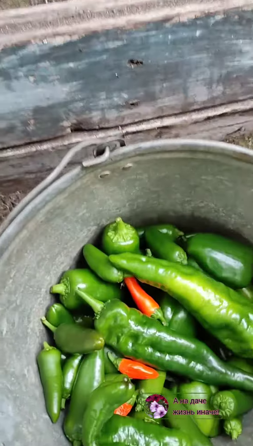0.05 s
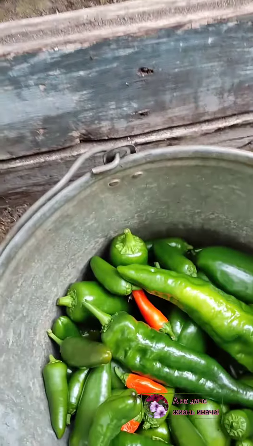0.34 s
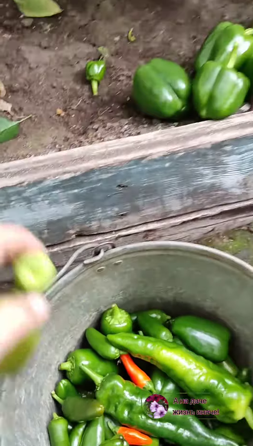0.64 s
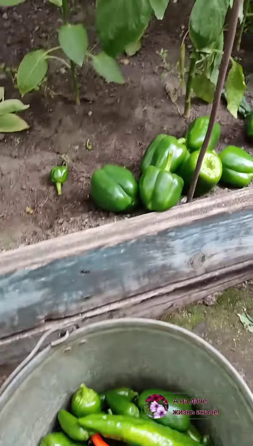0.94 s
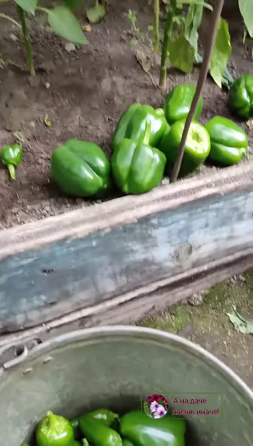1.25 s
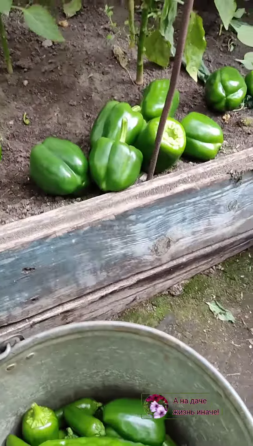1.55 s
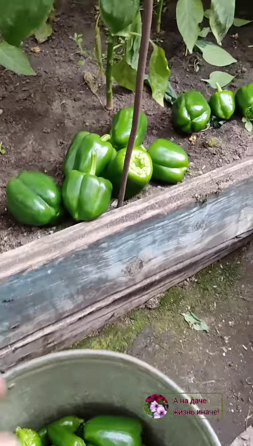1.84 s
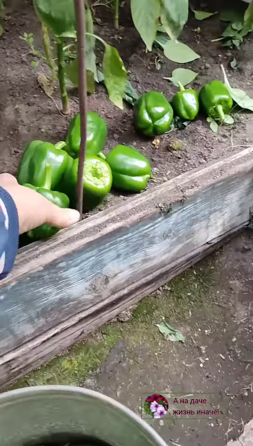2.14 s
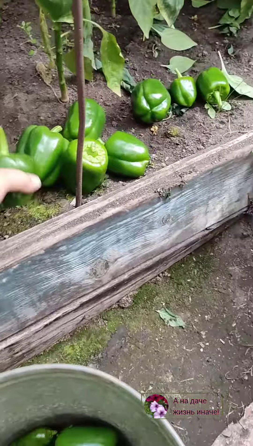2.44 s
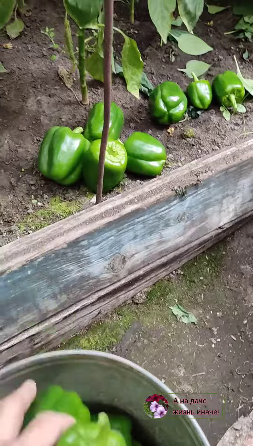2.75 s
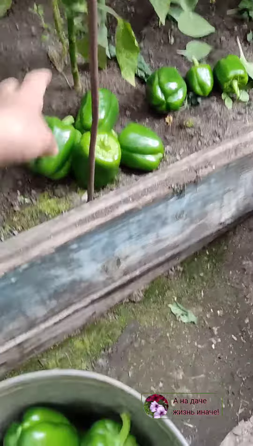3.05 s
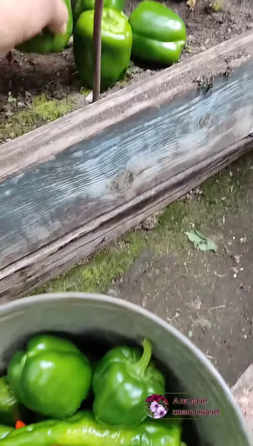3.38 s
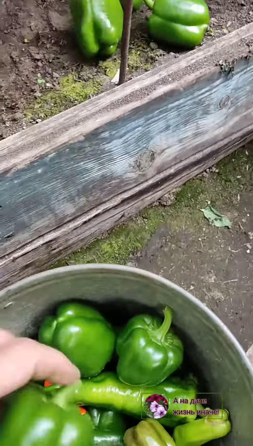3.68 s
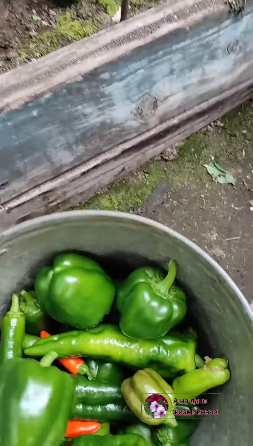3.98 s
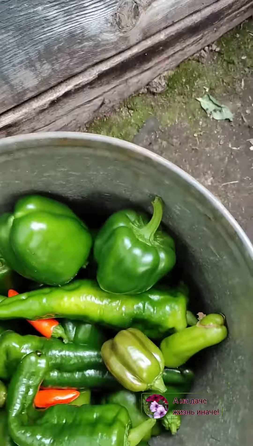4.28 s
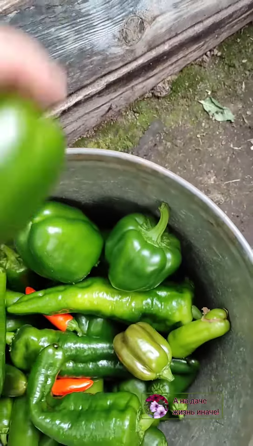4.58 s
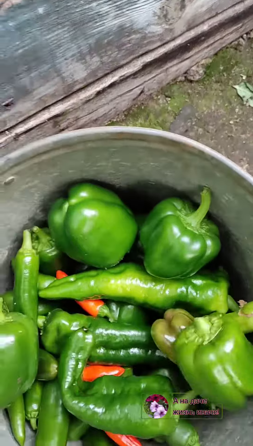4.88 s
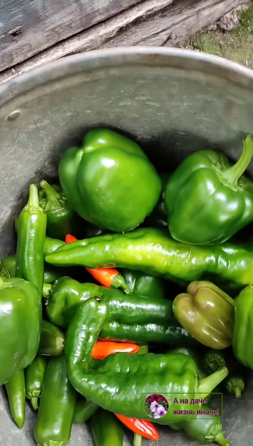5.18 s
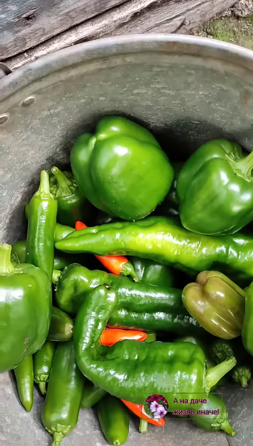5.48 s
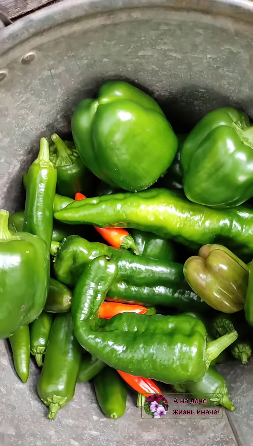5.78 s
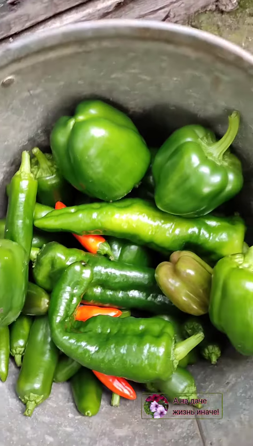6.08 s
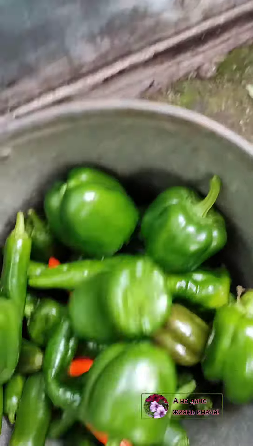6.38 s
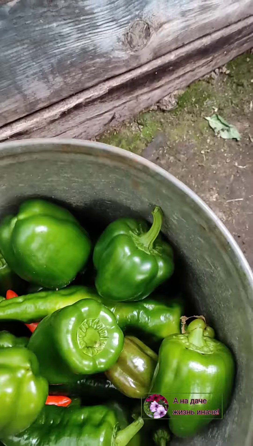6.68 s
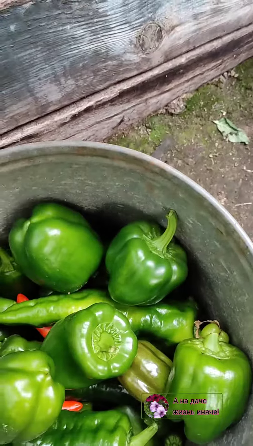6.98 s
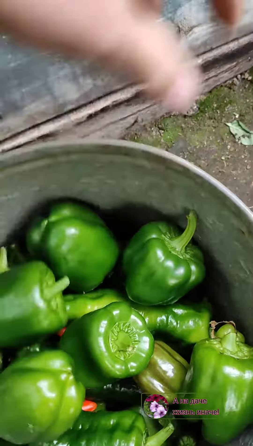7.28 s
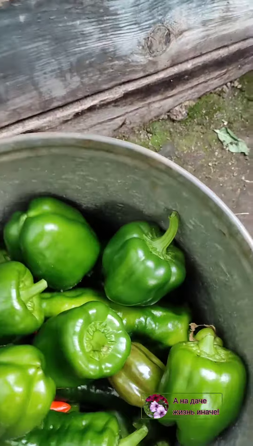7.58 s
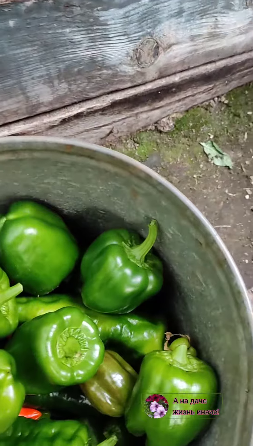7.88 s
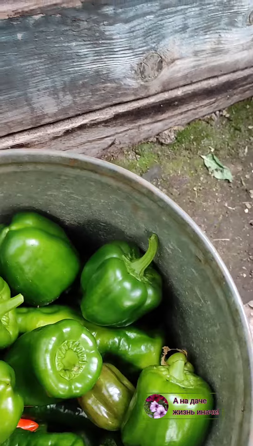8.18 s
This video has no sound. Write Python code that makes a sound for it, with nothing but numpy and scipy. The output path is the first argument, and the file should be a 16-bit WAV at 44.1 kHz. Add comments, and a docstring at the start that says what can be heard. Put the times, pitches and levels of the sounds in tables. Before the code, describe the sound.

Bell peppers drop into a metal bucket half full of peppers, close to the microphone, in a quiet greenhouse. A small tick and bump at 0.3 seconds lead to the first hollow knocks at about 0.9 seconds, as a pepper bounces and settles. A softer landing follows at 1.9 seconds. The loudest knocks come at 3 and 3.9 seconds, each with a dull thud and a brief gritty scrape of the jolted bucket. Lighter bumps follow until 4.4 seconds, then two firm knocks near 4.8 and 5 seconds make the bucket grate and hum faintly. After a lull with tiny ticks, peppers tumble in a quick cluster from 6.4 to 6.8 seconds. The last one lands at 7.4 seconds with a short scrape and faint ring. Throughout, a jacket sleeve swishes softly with each reach, continuing to the end at about 8 seconds.

```python
"""Bell peppers dropped by hand into a metal bucket half full of peppers, close to the microphone.
A jacket sleeve swishes with every reach over quiet greenhouse air; handled fruit ticks and bumps.
From 0.9 s hollow peppers land: they knock, bounce, rub the wall and rock to rest.
From 3 s hard landings jolt the bucket, whose bottom grates on grit; from 4.4 s some also set it humming.
The last pepper lands at 7.4 s and the sleeve swishes on."""
import sys
import numpy as np
from scipy import signal
from scipy.fft import rfft, irfft, next_fast_len
from scipy.io import wavfile
from scipy.ndimage import map_coordinates

SR = 44100
rng = np.random.default_rng(int(sys.argv[2]) if len(sys.argv) > 2 else 0)


def store_pcm(level_fs):
    """Save levels as 16-bit WAV."""
    pcm = np.round(np.clip(level_fs, -1, 1) * 32767).astype(np.int16)
    wavfile.write(sys.argv[1], SR, np.atleast_2d(pcm).T)


N = 362943

# left-right likeness of sleeve and air noise: f/Hz, correlation
COHERENCE = [(60, 0.015), (180, 0.69), (550, 0.25), (1650, -0.15), (4970, 0.098), (15000, -0.35)]


def amp(db):
    """Decibels to gain."""
    return 10 ** (np.asarray(db) / 20)


def unit_rms(x):
    """Scale to rms 1."""
    return x / np.sqrt(np.mean(x ** 2) + 1e-20)


def unit_energy(x):
    """Scale each channel to energy 1."""
    return x / np.linalg.norm(x, axis=-1, keepdims=True)


def along(points, hz):
    """Interpolate (f/Hz, value) points on a log axis."""
    f, v = np.transpose(points)
    return np.interp(np.log(hz + 1), np.log(f + 1), v)


def filtered(x, response):
    """Apply a frequency response."""
    n = x.shape[-1]
    m = next_fast_len(n + 8192)
    return irfft(rfft(x, m) * response(np.fft.rfftfreq(m, 1 / SR)), m)[..., :n]


def add(track, at_s, sound):
    """Mix a sound into a track."""
    part = track[..., max(round(at_s * SR), 0):][..., :sound.shape[-1]]
    part += sound[..., :part.shape[-1]]


def wobble(rate_hz):
    """Smooth random curve through Gaussian knots."""
    knots = rng.standard_normal(int(N * rate_hz / SR) + 4)
    return map_coordinates(knots, [np.arange(N) * rate_hz / SR])


def noise(gain, coherence, size):
    """Stereo noise of rms 1 with given gain and left-right correlation over frequency."""
    def mid_side(f):
        angle = np.arccos(np.clip(along(coherence, f), -1, 1)) / 2
        return gain(f) * np.array([np.cos(angle), np.sin(angle)])
    mid, side = filtered(rng.standard_normal((2, size)), mid_side)
    return unit_rms(np.array([mid + side, mid - side]))


def pan(left_right_db):
    """Channel gains for a level difference."""
    return amp([[left_right_db / 2], [-left_right_db / 2]])


def sleeve():
    """Cloth swishes and handling rumbles with each arm stroke, above a faint steady floor."""
    strokes = [(0, -55.5, 0.47), (0.79, -56.5, 0.66), (1.184, -55.5, 0.33), (1.73, -57.5, 0.33),
               (2.11, -54.5, 0.45), (2.63, -56, 0.28), (3.092, -47, 0.34), (3.558, -53.5, 0.28),
               (3.95, -54.5, 0.59), (4.2, -51.5, 0.2), (4.494, -54, 0.37), (5.07, -52, 0.4),
               (5.779, -58, 0.29), (6.119, -55, 0.29), (6.594, -53.5, 0.52), (6.99, -52.5, 0.11),
               (7.089, -52.5, 0.24), (7.673, -49.5, 0.32), (8.05, -57.5, 0.56)]  # arm strokes: fastest at t/s, level/dB, length/s
    cloth_spectrum = [(290, -47.5), (500, -35.5), (676, -7.5), (1250, -5.5), (1600, 0), (1900, -3.5),
                      (4570, -6), (4980, -10.5), (6640, -7), (7130, -12.5), (8360, -5.5), (12100, -11),
                      (15500, -13.5)]  # rubbing cloth: f/Hz, level/dB
    rumble_spectrum = [(18, -94), (30, -22.5), (86, -2.5), (135, -3), (200, -1.5), (392, 4.5), (485, -5.5),
                       (590, -2), (779, -6), (874, -6.5), (1290, -7.5), (1500, -15.5), (1950, -32.5),
                       (3300, -120)]  # handling rumble: f/Hz, level/dB
    hiss_db, rumble_db, rumble_floor_db = -70, -4.5, -65.5
    t = np.arange(N) / SR
    motion = np.sqrt(sum((amp(db) * np.exp(-np.abs(2 * (t - at_s) / length_s) ** 1.68)) ** 2
                         for at_s, db, length_s in strokes))
    swish = np.hypot(motion, amp(hiss_db)) * amp(0.98 * wobble(150) + 1.4 * wobble(18))
    swish = swish * noise(lambda f: amp(along(cloth_spectrum, f)), COHERENCE, N)
    swish *= np.hypot(1, crumbs()) * pan(-3)
    rumble = np.hypot(amp(rumble_db) * motion, amp(rumble_floor_db)) * amp(1.6 * wobble(25))
    return swish + rumble * noise(lambda f: amp(along(rumble_spectrum, f)), COHERENCE, N)


def crumbs():
    """Sparse tiny ticks of cloth and soil, as a gain on the sleeve's noise."""
    rate_hz, level_db, spread_db, decay_s = 10, 10, 1.5, 0.00065
    hits = (rng.random(N) < rate_hz / SR) * amp(level_db + spread_db * rng.uniform(-1.2, 1, N))
    return signal.lfilter([1], [1, -np.exp(-1 / (decay_s * SR))], hits)


def air():
    """Low murmur of still air."""
    spectrum = [(18, -69), (30, -43), (105, -3.5), (140, 2.5), (197, -10), (219, -23), (518, -18),
                (591, -21), (767, -16), (1910, -22.5), (15500, -48.5)]  # greenhouse air: f/Hz, level/dB
    return amp(-70.5) * noise(lambda f: amp(along(spectrum, f)), COHERENCE, N)


def rocking():
    """A pepper settles on its neighbours in uneven, fading touches; returns rows for knocks()."""
    settlings = [(.002, .02, -44.5), (1.063, .02, -44), (1.143, 0.14, -44), (1.984, 0.11, -44),
                 (3.008, 0.14, -31.5), (3.911, 0.096, -38.5), (6.782, 0.013, -39), (7.413, .02, -36.5)]  # spells of rocking: t/s, length/s, first touch/dB
    period_s, jitter_share, fade_db_per_s = 0.034, 0.067, 83
    ring_s, slap_db, flesh_db = 0.0099, -4, 9
    touches = []
    for at_s, length_s, first_db in settlings:
        for k, (late, detune, patch) in enumerate(rng.standard_normal((8, 3))):
            if k * period_s < length_s:
                after_s = period_s * (k + min(k, 1) * jitter_share * late)
                db = first_db - fade_db_per_s * after_s
                hz, skin_hz = 344.6 * (1 + 0.066 * detune), 750 * np.exp(0.2 * patch)
                touches.append((at_s + after_s, db, hz, ring_s, slap_db, skin_hz, flesh_db))
    return touches


def knocks():
    """Contact swells a pepper's hollow note until the pile damps it; flesh thuds, skin slaps."""
    # landings and bounces: t/s, level/dB, f/Hz, ring/s, relative slap/dB, skin f/Hz, relative flesh/dB
    landings = [(.922, -28, 347, 0.0053, -16, 680, 0), (0.94, -21.5, 342, 0.0083, -12, 646, 5),
                (.954, -29, 333, 0.011, -14.5, 810, -9), (.982, -27.5, 334, .0096, -9.5, 820, 2),
                (1.021, -34, 330, 0.008, -16, 684, 0), (1.037, -38, 370, 0.013, -3.5, 1000, 0),
                (1.115, -20.5, 347, 0.0066, -16, 1017, -14), (1.907, -34.5, 375, 0.01, 1, 646, -8),
                (1.937, -35, 322, 0.0066, -3.5, 620, -4), (1.955, -40, 310, 0.0056, -14, 650, -3),
                (2.167, -43, 338, .01, -16, 623, -1), (2.928, -28.5, 361, 0.0078, -9.5, 650, -1.5),
                (2.966, -10, 338, 0.0051, -16, 770, -0.5), (2.988, -18.5, 340, 0.0066, -11.5, 790, -2),
                (3.051, -27, 329, 0.0083, -20.5, 660, 5), (3.147, -40, 388, 0.011, -2, 1015, 3),
                (3.664, -49.5, 312, 0.013, 0.5, 600, -5), (3.876, -11, 333, 0.0057, -16, 620, -5),
                (3.885, -13, 325, 0.0045, -11.5, 1144, 0), (4.037, -35.5, 353, 0.0085, -11, 675, 13),
                (4.149, -25.5, 308, 0.0032, -16, 624, 3), (4.173, -41, 346, 0.011, -13, 1140, 7),
                (4.381, -29.5, 339, 0.0062, -10.5, 630, 4), (4.401, -39.5, 330, 0.0074, -7, 630, -2),
                (4.837, -19.5, 349, 0.0058, -6, 620, 5), (4.85, -15.5, 327, .0068, -10.5, 647, -9),
                (4.928, -23.5, 335, 0.0051, -6.5, 796, 3), (4.956, -19.5, 301, 0.0058, -6.5, 625, 2.5),
                (4.978, -29, 337.7, 0.012, -19, 666, 10), (5.012, -38, 346, 0.016, -8, 644, -3),
                (5.083, -43, 372, 0.0094, -6, 755, 14), (5.114, -43.5, 340, 0.013, -9, 800, -4),
                (6.387, -22, 354, 0.0055, -6, 720, -1), (6.397, -18.5, 313, 0.0046, -14.5, 570, -2),
                (6.412, -23.5, 317, 0.0082, -9, 1040, 3), (6.445, -27.5, 333, 0.007, -1, 1114, 11),
                (6.452, -35, 340, 0.0038, 1.5, 1260, 3), (6.472, -32, 328.4, 0.0099, -6.5, 1150, -10),
                (6.483, -24, 332, 0.0067, -11, 732, -8), (6.52, -34, 343, 0.0053, -15, 700, 0),
                (6.533, -21.5, 322, 0.0084, -14, 724, -6), (6.551, -29.5, 335, .012, -6.5, 650, -1),
                (6.639, -29.5, 300, 0.0091, -5, 930, 10), (6.761, -41, 312, 0.0088, -3.5, 870, -3),
                (7.356, -27.5, 329, 0.0099, -10.5, 900, 0), (7.375, -21, 314, 0.0063, -4, 1064, 2),
                (7.388, -31.5, 323, 0.012, -1.5, 664, 2)]
    cavity_modes = [(1, 1.5, 1.724), (1.19, -16, 3.57), (1.951, -33, .27)]  # air in the fruit: f ratio, level/dB, ring time ratio
    flesh_modes = [(.48, -18.5, 1.3), (.66, -13, 1.2)]  # soft wall squashing: f ratio, level/dB, ring time ratio
    skin_modes = [(1, 3), (1.65, -20)]  # struck patch of skin: f ratio, level/dB
    skin_loss = [(600, -1), (1200, -3.5)]  # smaller, stiffer patches sound weaker: f/Hz, level/dB
    slap_spectrum = [(40, -29), (85, -17.5), (150, 4), (240, 5.5), (450, -2.5), (700, -2.5), (1150, -7),
                     (1700, -12.5), (3000, -16), (8000, -25), (15000, -29)]  # slap noise: f/Hz, level/dB
    cavity_db, crack_t60_s, puff_t60_s = 5, 0.014, 0.094
    out, t = np.zeros((2, N)), np.arange(SR // 6) / SR

    def notes(modes, hz, ring_s):
        return sum(amp(db) * np.sin(2 * np.pi * hz * ratio * t) * np.exp(-(t / (ring_s * share)) ** 1.65)
                   for ratio, db, share in modes)

    for at_s, db, hz, ring_s, slap_db, skin_hz, flesh_db in landings + rocking():
        hollow = notes(cavity_modes, hz, ring_s) * (1 - np.exp(-t / 0.006))
        thud = amp(flesh_db) * notes(flesh_modes, hz, ring_s) * (1 - np.exp(-t / 0.0092))
        skin = sum(amp(level) * np.sin(2 * np.pi * skin_hz * ratio * t) for ratio, level in skin_modes)
        skin *= amp(along(skin_loss, skin_hz) - 60 * t / 0.042)
        burst = noise(lambda f: amp(along(slap_spectrum, f)), [(400, 0.95), (1500, 0.14)], len(t))
        burst *= amp(-1.5 - 60 * t / puff_t60_s) + amp(-0.5 - 60 * t / crack_t60_s)
        slap = (skin + burst) * (1 - np.exp(-t / 0.00083))
        add(out, at_s, amp(db) * (amp(cavity_db) * (hollow + thud) + amp(slap_db) * slap))
    return out


def resonance(f, hz, half_width_share=0.12):
    """Gain of a peak at hz."""
    return 1 / (1 + ((f - hz) / (half_width_share * hz)) ** 2)


def ticks():
    """Stalks, skins and fingers tick and scuff: two-peaked noise that dies fast once contact ends."""
    contacts = [(.271, -40, 3400, 3, 0.0012), (0.282, -46, 3370, -1, .001), (0.366, -57, 7000, -3, .005),
                (0.385, -49, 3400, -11, 0.015), (1.982, -50, 6130, 10, 0.021), (2.514, -44, 750, -28, .003),
                (2.592, -43, 2760, -22, 0.0011), (2.912, -48, 2780, -10, .04),
                (3.131, -37.5, 10400, -13, 0.0018), (3.931, -50, 8000, -8, .001),
                (4.136, -43.5, 1190, -23, .0035), (4.632, -48.5, 730, -21.5, .004),
                (5.431, -57.5, 8600, 0, 0.024), (5.819, -51.5, 6100, -8, 0.0055),
                (6.045, -47.5, 1370, -1, 0.007)]  # light contacts: t/s, level/dB, f/Hz, relative snap/dB, contact/s
    t60_s, tail_db, tail_t60_s = 0.009, -10, 0.06
    out, t = np.zeros((2, N)), np.arange(SR // 8) / SR
    for at_s, db, hz, snap_db, contact_s in contacts:
        peaks = lambda f: resonance(f, hz) + amp(-5) * resonance(f, 0.66 * hz)
        colour = lambda f: (amp(snap_db) + peaks(f)) * f / (f + 400)
        tick = noise(colour, [(400, 1.0), (3000, 0.13)], len(t))
        free_s = np.maximum(t - contact_s, 0)
        decay = amp(-60 * free_s / t60_s) + amp(tail_db - 60 * free_s / tail_t60_s)
        add(out, at_s, amp(db) * tick * (1 - np.exp(-t / 0.00035)) * decay)
    return out


def bumps():
    """Hand, fruit on soil and shifting pile thud: two low notes lasting a few cycles."""
    thuds = [(.277, -31.5, 215), (.375, -43, 169), (.485, -47, 170), (0.943, -24.5, 148.5),
             (.958, -34.5, 125), (.982, -32, 195), (2.912, -32, 332), (2.962, -23.5, 185),
             (2.986, -26, 194), (3.05, -33, 212), (3.764, -34, 218), (3.886, -17, 236), (4.631, -46, 166),
             (4.836, -27.5, 150), (4.955, -21.5, 172), (5.07, -34.5, 141), (5.194, -44.5, 177),
             (6.39, -22.5, 142), (6.445, -30, 161), (7.373, -40, 144)]  # dull contacts: t/s, level/dB, f/Hz
    rise_s, decay_s = 0.0066, 0.013
    out, t = np.zeros((2, N)), np.arange(SR // 8) / SR
    envelope = (1 - np.exp(-t / rise_s)) * np.exp(-(t / decay_s) ** 1.5)
    for at_s, db, hz in thuds:
        thud = np.sin(2 * np.pi * hz * t) + amp(-6) * np.sin(2 * np.pi * 0.67 * hz * t)
        add(out, at_s, amp(db) * thud * envelope)
    return out


def grates():
    """Fruit rubs the wall or a jolt drags the bucket over grit: tiny slips ring the thin metal."""
    # scrapes: t/s, length/s, level/dB, treble/dB, left-right/dB, rubbed spot f/Hz, relative spot/dB
    scrapes = [(0.95, 0.021, -45, 0, -3, 1250, 0), (0.97, 0.038, -47.5, 1, -1, 1520, -1.5),
               (1.008, .022, -52, -10, -3, 1590, 1), (1.122, .012, -45.5, -12, -4, 1490, -6),
               (1.917, 0.0064, -38.5, 15, -2, 4440, -8.5), (2.919, 0.036, -45, 0, -5.5, 6740, -8.5),
               (2.962, 0.0095, -31.5, -9.5, 5.5, 1560, -2), (2.972, 0.012, -18.5, 3, 2, 1597, -4),
               (2.984, 0.0035, -16, 7, -5, 4730, -9), (2.991, 0.0042, -12.5, 7, 2, 6300, -2),
               (3.001, 0.034, -36, 3, -3, 1650, -10), (3.027, 0.036, -43, 4, 1.5, 1630, -7.5),
               (3.882, 0.0081, -31.5, 10, 3, 1710, -1.5), (4.136, 0.017, -48.5, 9, 2, 1870, -7),
               (4.16, 0.0063, -41.5, 8, 0, 4040, -7), (4.381, .011, -32.5, -28, 1, 1810, -10),
               (4.394, 0.023, -40.5, -19, 0.5, 1810, -5.5), (4.842, 0.0027, -28.5, 15.5, 2, 8900, 4.5),
               (4.851, 0.011, -24, -9, 1.5, 7800, -6), (4.926, .0016, -46, 8.5, 7, 6600, -13.5),
               (4.955, 0.014, -29.5, -13, 6, 1750, -5), (4.97, 0.018, -17, -2, 1.5, 2040, -9),
               (4.989, 0.012, -21.5, -3.5, .5, 2060, -8), (6.386, 0.045, -38, 9, 2.5, 1670, -1.5),
               (6.448, 0.019, -38.5, 10, 3, 1480, -5), (6.466, 0.13, -50.5, 5, 2, 1180, -10),
               (6.639, 0.0012, -38.5, 13, 4, 1510, -15), (7.357, .014, -43, -23, -6, 1550, -10),
               (7.377, 0.0031, -25, 2, 6, 8800, -2), (7.387, .018, -24.5, -7, 0, 3530, -19),
               (7.407, 0.014, -32.5, -1, -3, 1800, -5)]
    wall_modes = [(1590, -1), (1690, 1.5), (2040, -9), (2525, 3.5), (2670, 5.5), (4025, -1.5), (4500, -1.5),
                  (4980, 0.5), (5350, -0.5), (6170, -6), (7270, -14), (7800, -5), (8330, 1), (9055, -8)]  # metal wall: f/Hz, level/dB
    slip_spectrum = [(100, -13), (170, -20), (300, 1), (620, -4.5), (950, -9), (1650, 3), (2200, -5.5),
                     (2600, 1.5), (4000, 1), (6000, 0.5), (8500, -0.5), (11000, -9), (15500, -17.5)]  # click of one slip: f/Hz, level/dB
    wall_db, wall_t60_s, spot_t60_cycles = -10.5, 0.096, 35
    rise_share, clump_db, clump_rate_hz = 0.063, -1, 810
    out, t = np.zeros((2, N)), np.arange(SR // 7) / SR
    clumps = unit_rms(amp(clump_db * wobble(clump_rate_hz)))
    mode = lambda hz, t60_s: np.sin(2 * np.pi * (hz * t + rng.random((2, 1)))) * amp(-60 * t / t60_s)
    for at_s, length_s, db, treble_db, pan_db, spot_hz, spot_db in scrapes:
        stroke = 1 - np.exp(-t / (rise_share * length_s))
        stroke *= amp(-60 * np.maximum(t - length_s, 0) / 0.027)
        slips = rng.laplace(size=len(t)) / np.sqrt(2) * stroke * clumps[round(at_s * SR):][:len(t)]
        # response to one slip: broad click, faint tail of dense modes, wall, rubbed spot
        colour = lambda f: amp(along(slip_spectrum, f) + along([(8500, 0), (11000, treble_db)], f))
        tail = unit_energy(filtered(rng.standard_normal((2, len(t))) * amp(-60 * t / 0.076), colour))
        click = unit_energy(bucket_echoes(colour, len(t)))
        wall = unit_energy(sum(amp(level) * mode(hz, wall_t60_s) for hz, level in wall_modes))
        spot = unit_energy(mode(spot_hz, spot_t60_cycles / spot_hz))
        metal = unit_energy(click + amp(-7.5) * tail + amp(wall_db) * wall + amp(spot_db) * spot)
        add(out, at_s, amp(db) * signal.fftconvolve(slips[None], metal, axes=1) * pan(pan_db))
    return out


def bucket_echoes(colour, size):
    """Echoes in the bucket delay and ripple each frequency, differently at each microphone."""
    max_delay_s, step_hz, ripple_db = 0.002, 398.5, 4
    f = np.fft.rfftfreq(2 * size, 1 / SR)
    smooth = lambda knots: np.array([np.interp(f / step_hz, np.arange(len(k)), k) for k in knots])
    delay_s = max_delay_s * smooth(rng.random((2, 80)))
    gain = colour(f) * amp(ripple_db * smooth(rng.standard_normal((2, 80))))
    return irfft(gain * np.exp(-2j * np.pi * np.cumsum(delay_s, axis=1) * f[1]))[:, :size]


def hums():
    """The jolted bucket rings on faintly, longest near 550 Hz."""
    jolts = [(4.385, -45.5), (4.845, -41), (4.966, -37.5), (7.378, -39.5)]  # jolts that ring the bucket: t/s, level/dB
    modes = [(399.2, 13, 0.13), (547, -10, 0.34), (557, -0.5, 0.5), (654, -4.5, 0.29), (1107, -2, 0.092),
             (1450, -13.5, .14), (2100, -11, .15), (4000, -10, .2), (5900, -11, .18)]  # lasting bucket modes: f/Hz, level/dB, t60/s
    out, t = np.zeros(N), np.arange(SR) / SR
    for at_s, db in jolts:
        ring = sum(amp(level - 60 * t / t60_s) * np.sin(2 * np.pi * (hz * t + rng.random()))
                   for hz, level, t60_s in modes)
        add(out, at_s, amp(db) * ring * (1 - np.exp(-t / 0.0087)))
    return out


def greenhouse(x):
    """Weak diffuse reverberation, each frequency dying at its own rate."""
    decay_times = [(120, 1), (350, 0.32), (1500, 0.22), (6000, 0.24), (14000, 0.047)]  # room decay: f/Hz, t60/s
    hz, t, spectra = signal.stft(rng.standard_normal((2, SR // 2)), SR, nperseg=256)
    tail = signal.istft(spectra * amp(-60 * t / along(decay_times, hz)[:, None]), SR, nperseg=256)[1]
    tail *= 1 - np.exp(-np.arange(tail.shape[1]) / SR / 0.0021)
    wet = signal.fftconvolve(x, tail / np.linalg.norm(tail[0]), axes=1)[:, :N]
    return filtered(wet, lambda f: amp(along([(150, -28.5), (350, -20), (1500, -15), (8000, -23)], f)))


def scene():
    """Fruit and bucket radiate little deep bass and reach the left microphone first."""
    left_lead_s, bass_cut_hz = 0.00013, 60
    radiation = lambda f: (1j * f / (1j * f + bass_cut_hz)) ** 2
    arrival = lambda f: np.exp(1j * np.pi * f * left_lead_s * np.array([[1], [-1]]))
    contacts = knocks() + grates() + hums() + ticks() + bumps()
    near = filtered(contacts, lambda f: radiation(f) * arrival(f))
    return near + greenhouse(near) + sleeve() + air()


def record(dry):
    """Two microphone ports of unequal colour, soft peak limiting, steep low-pass."""
    port_balance = [(100, 0), (350, -2), (1000, 0), (4000, 1), (8300, 7), (10500, -7), (12500, -8),
                    (15500, 2)]  # port imbalance: f/Hz, left-right/dB
    ceiling, top_hz = 0.75, 15400
    x = filtered(dry, lambda f: amp(along(port_balance, f) * np.array([[0.5], [-0.5]])))
    x = x / (1 + (x / ceiling) ** 4) ** 0.25
    return filtered(x, lambda f: 1 / np.sqrt(1 + (f / top_hz) ** 160))


dry = scene()
out = record(dry)
store_pcm(out)
```